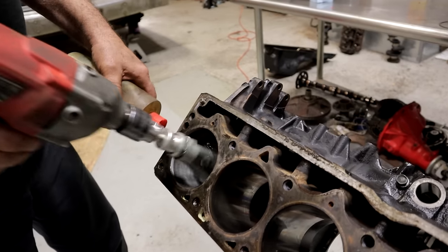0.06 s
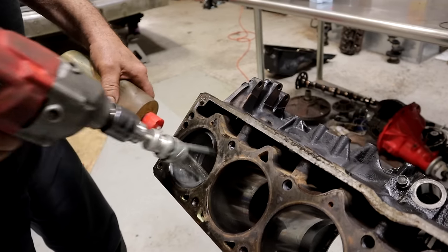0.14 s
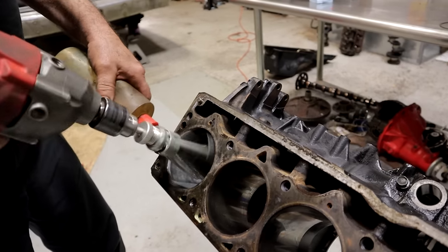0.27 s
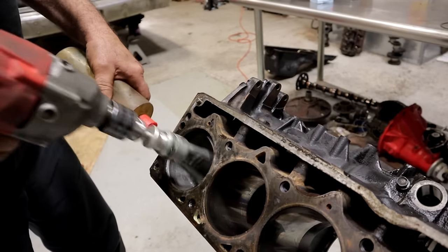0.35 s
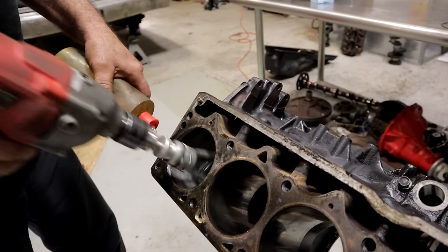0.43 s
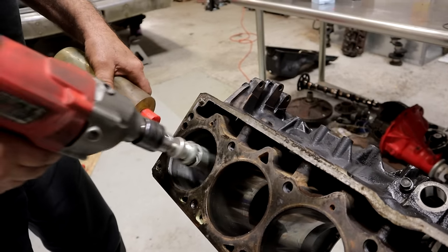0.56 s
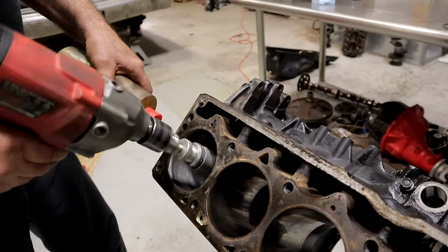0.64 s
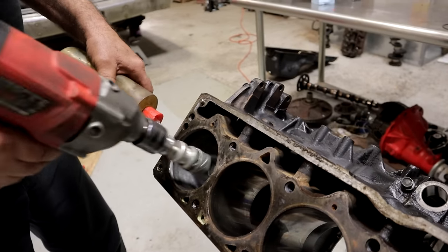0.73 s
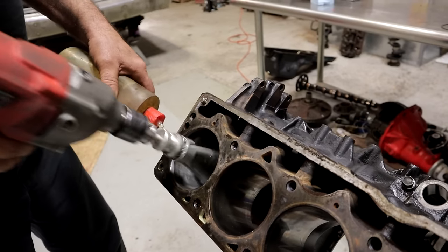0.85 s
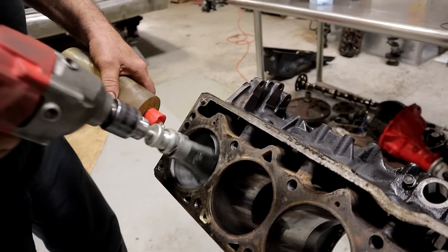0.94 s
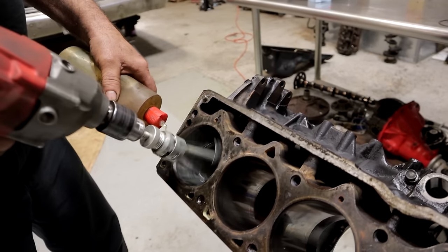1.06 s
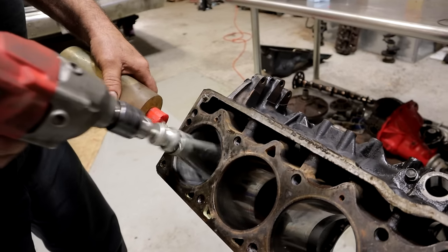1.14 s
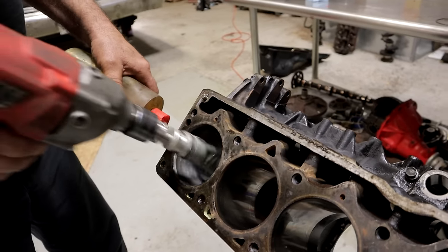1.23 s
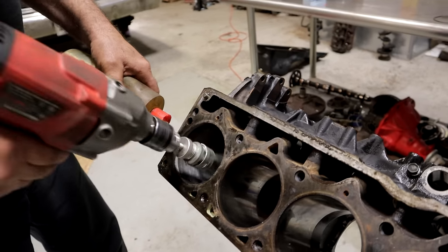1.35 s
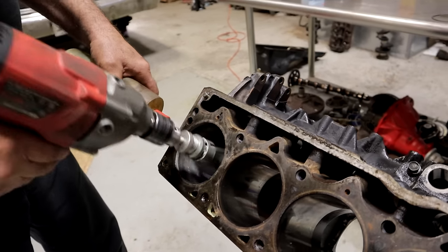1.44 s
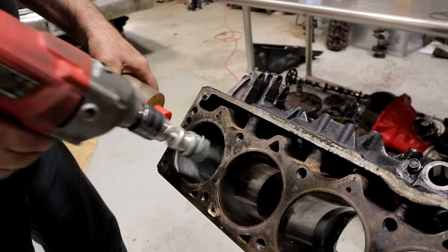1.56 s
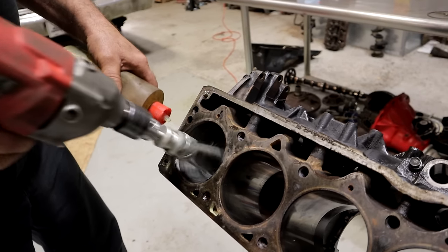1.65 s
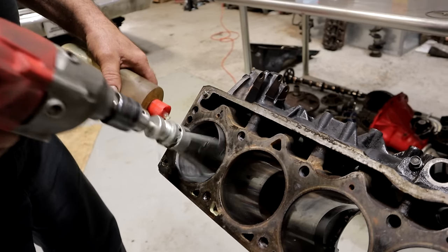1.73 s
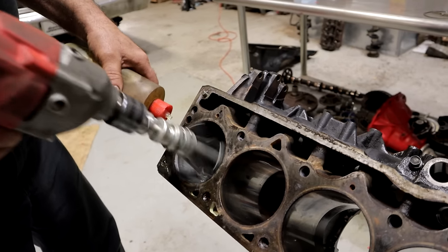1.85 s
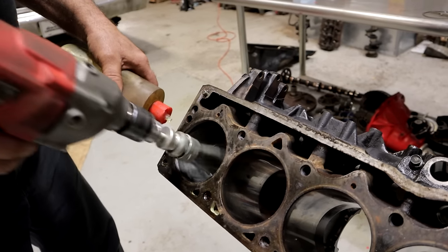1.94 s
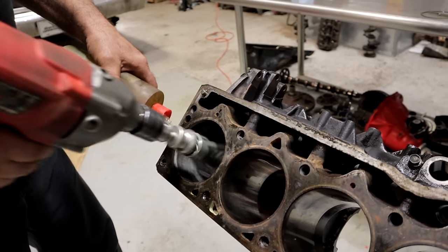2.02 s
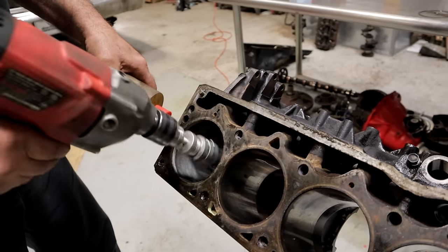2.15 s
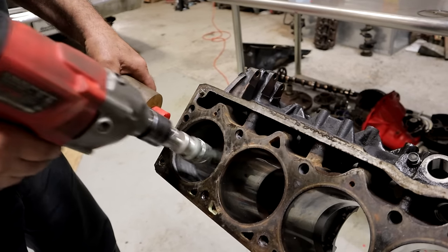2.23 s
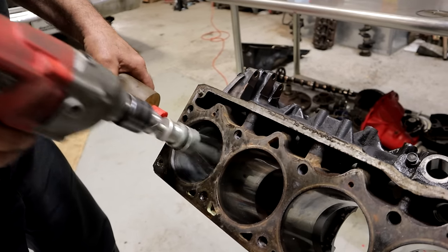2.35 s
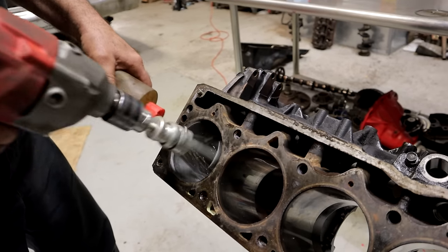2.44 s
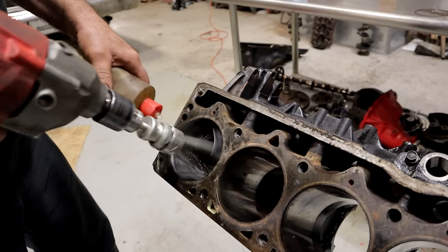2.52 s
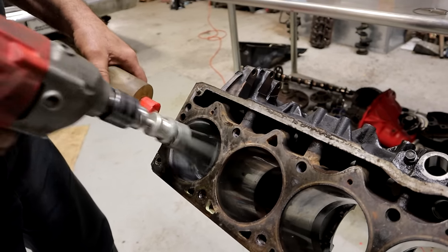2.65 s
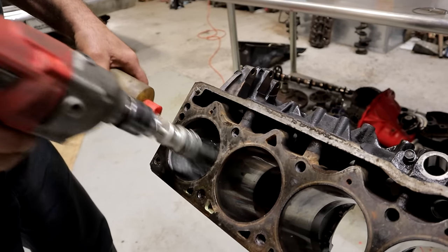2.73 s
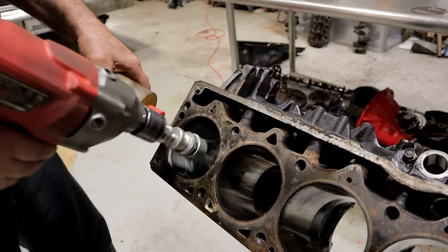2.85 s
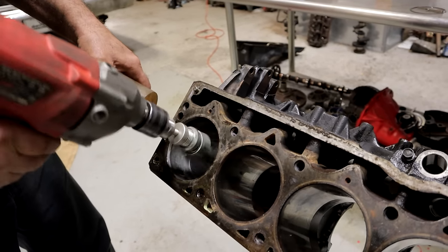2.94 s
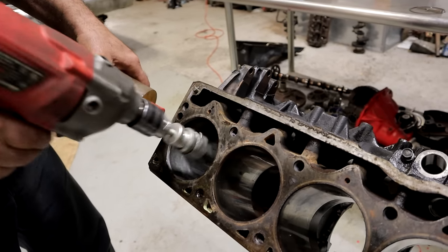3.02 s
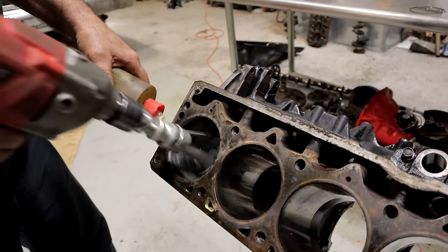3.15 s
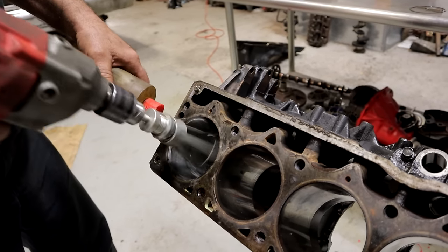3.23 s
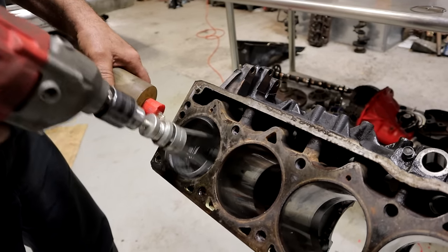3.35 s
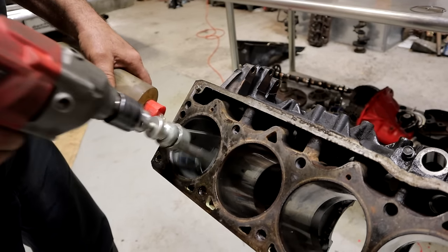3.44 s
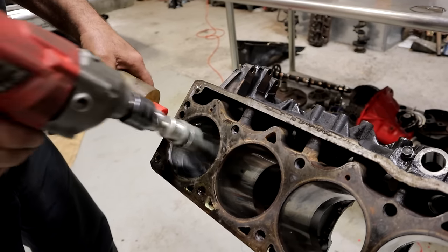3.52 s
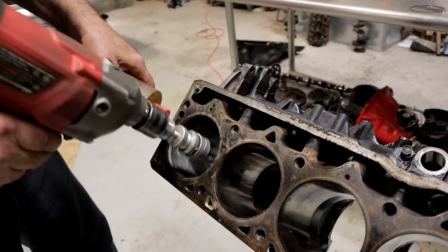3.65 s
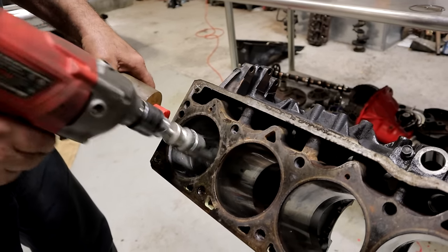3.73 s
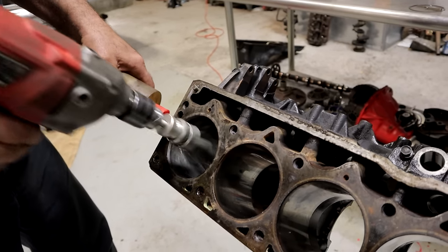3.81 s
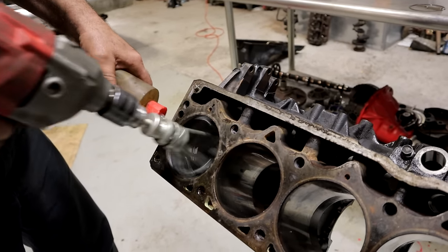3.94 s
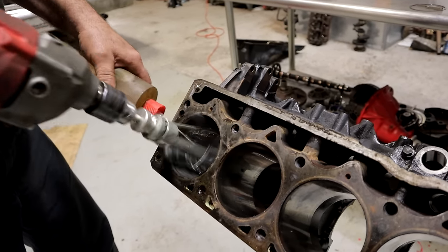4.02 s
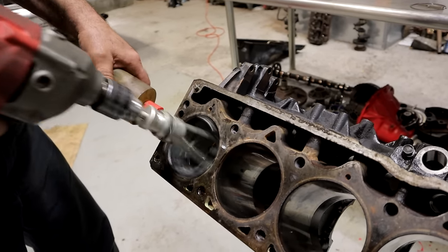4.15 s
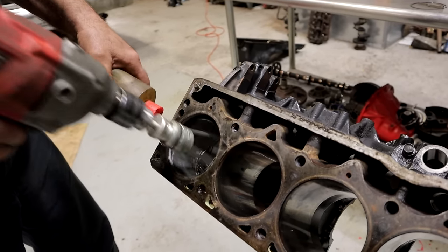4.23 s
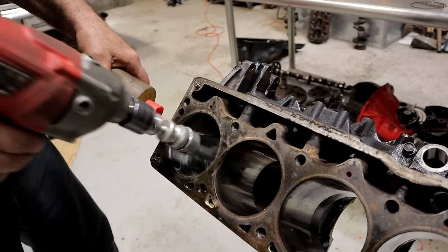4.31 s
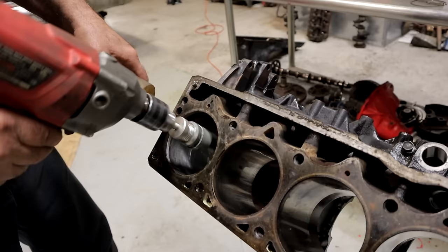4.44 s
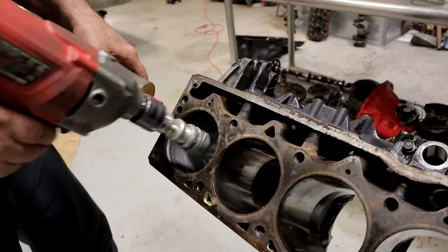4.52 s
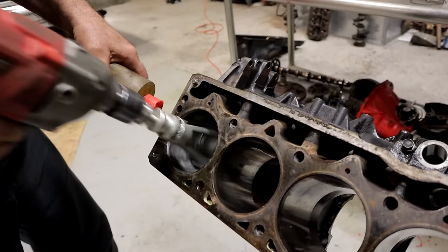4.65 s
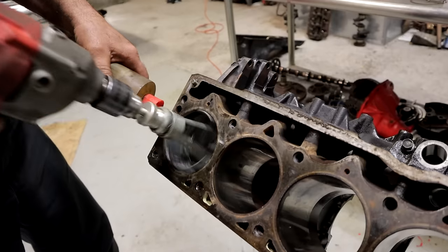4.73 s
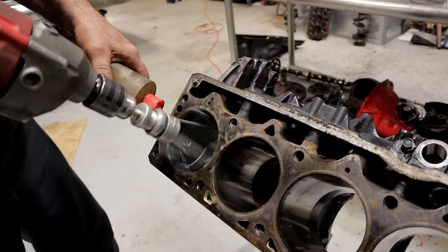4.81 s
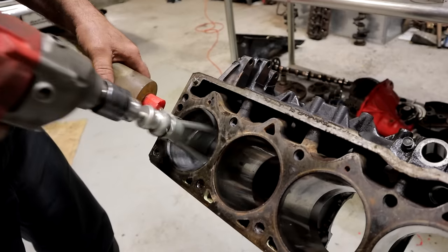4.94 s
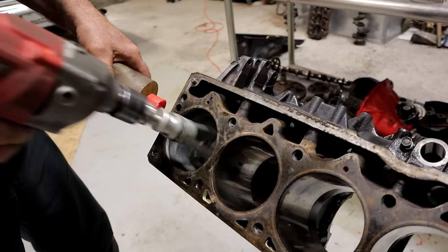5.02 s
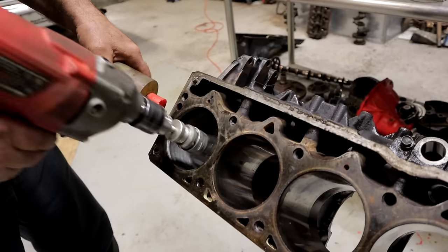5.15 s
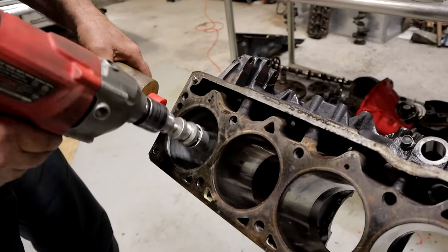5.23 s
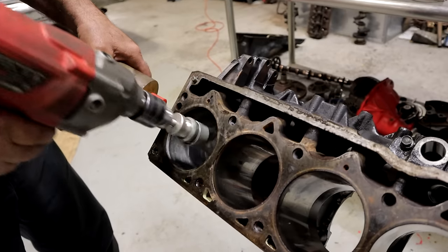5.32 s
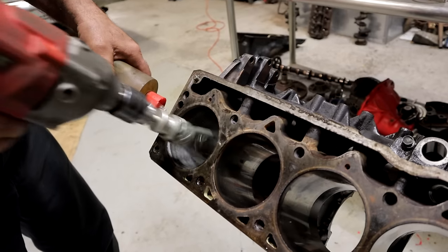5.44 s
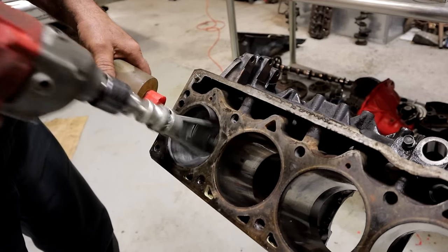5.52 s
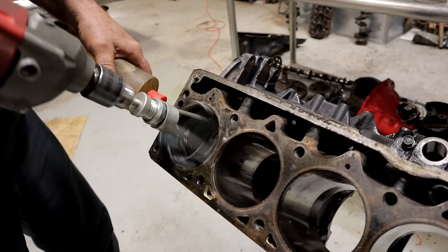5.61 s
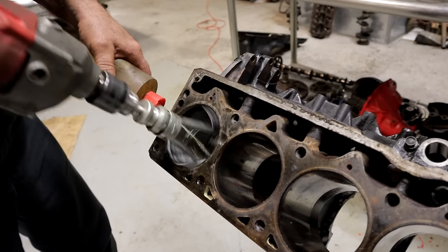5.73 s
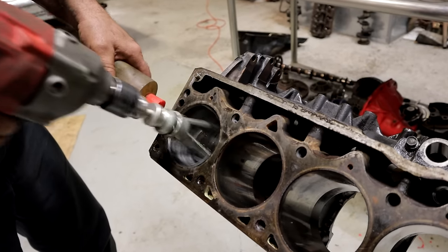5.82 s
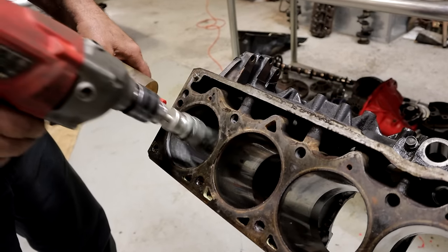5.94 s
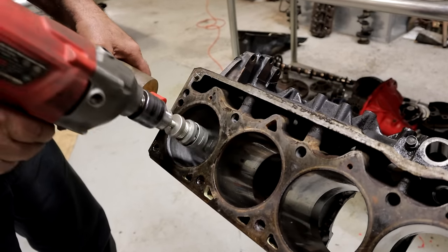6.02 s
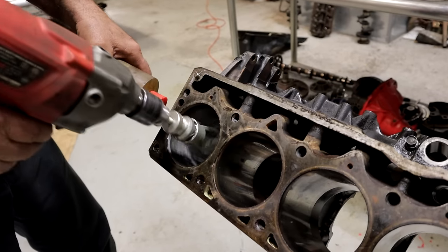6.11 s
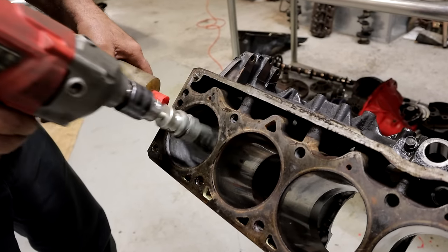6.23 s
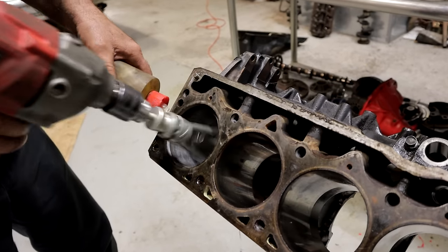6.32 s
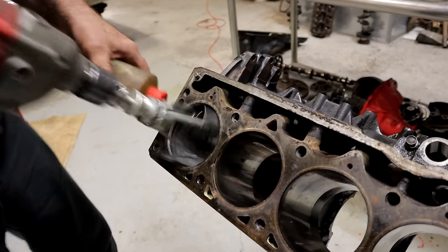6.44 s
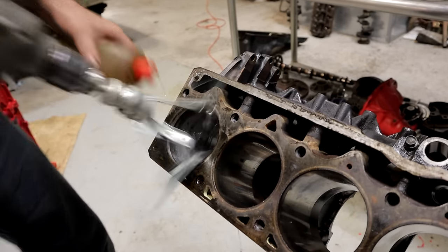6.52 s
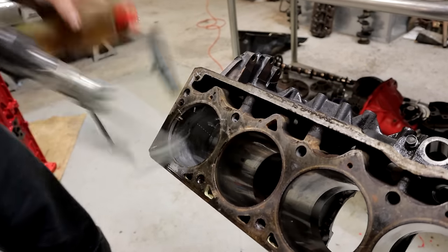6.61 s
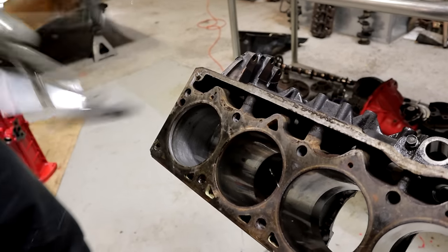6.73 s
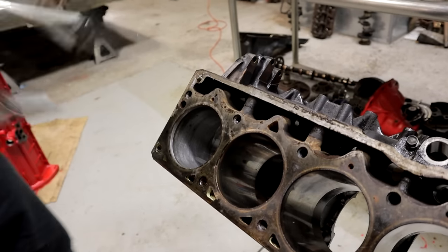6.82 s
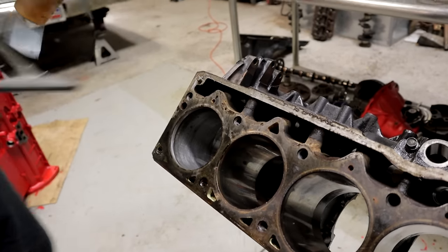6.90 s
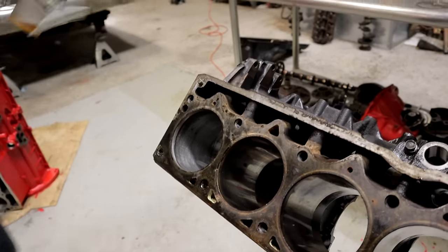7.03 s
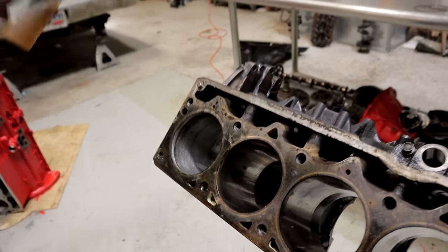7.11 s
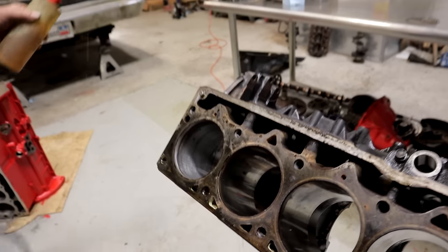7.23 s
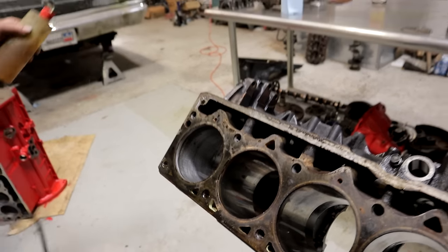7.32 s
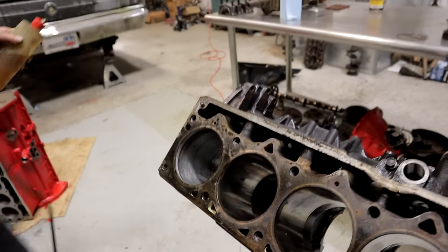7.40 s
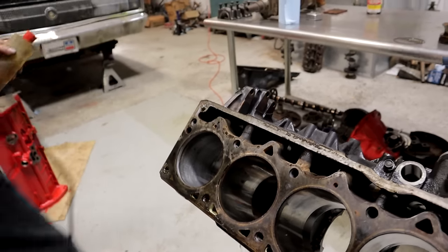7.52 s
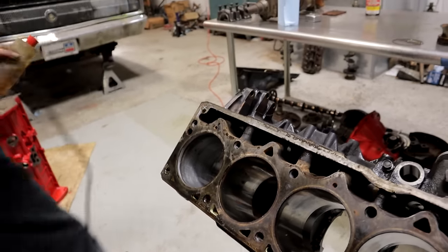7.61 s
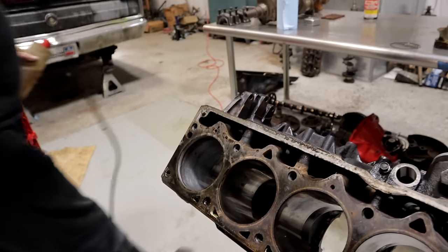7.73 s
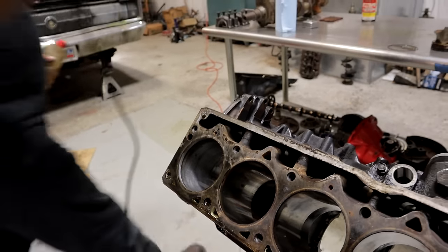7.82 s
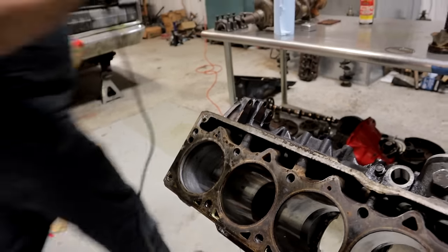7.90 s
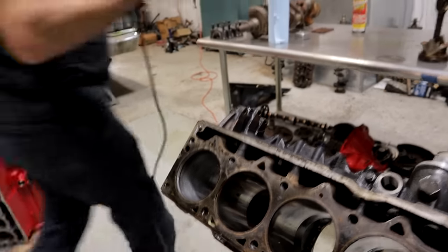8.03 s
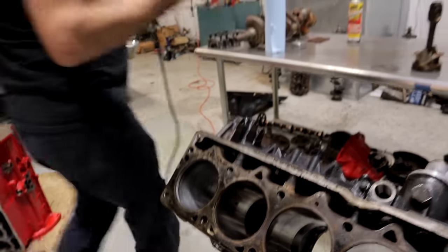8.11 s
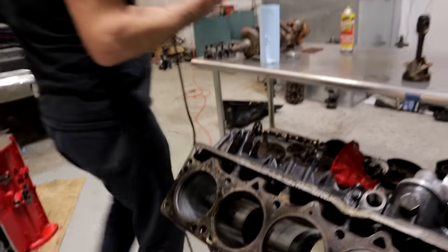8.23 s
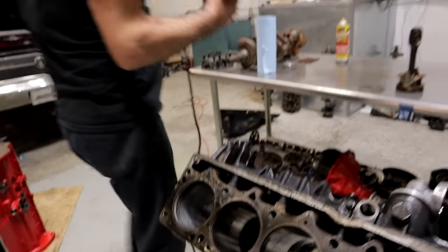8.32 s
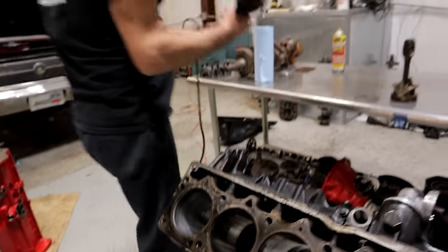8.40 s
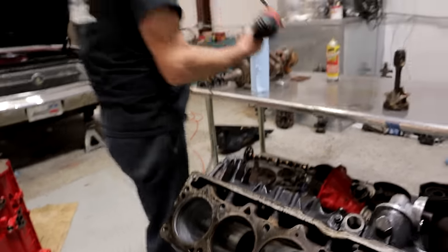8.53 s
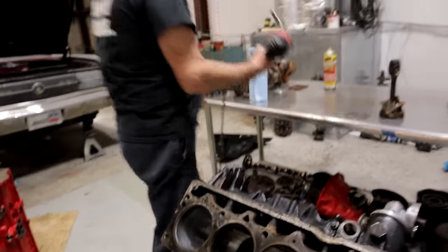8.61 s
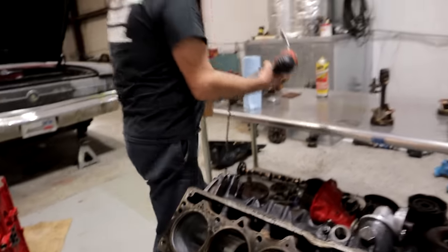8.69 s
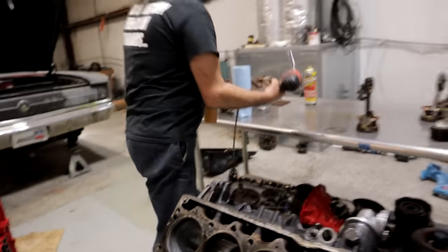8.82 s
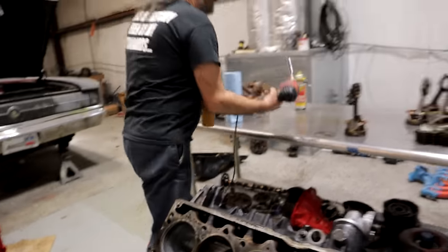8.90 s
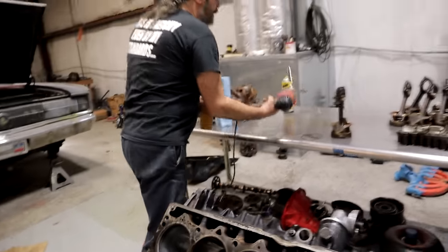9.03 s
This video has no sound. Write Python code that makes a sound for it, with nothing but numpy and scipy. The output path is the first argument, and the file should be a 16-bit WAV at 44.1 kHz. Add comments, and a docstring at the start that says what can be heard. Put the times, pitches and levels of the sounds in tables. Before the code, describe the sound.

A loud, close drill grinds abrasive stones inside a cylinder, with quick back-and-forth scrape swells, oily hiss, short screeches and a few hard gear crunches. One hard clack lands midway and the roar dips slightly. The tool clatters free, a high steel ping rings, and the unloaded motor winds down, whistling lower while loose gears tick slower. Light handling knocks and a step follow in quiet, lightly echoing room air.

```python
"""A close roar first: an electric drill spins a honing tool up and down an oiled cast-iron bore in a garage.
Shaped noise makes the fan, random grains the rattling gears and scraping stones, blurred sines the whine.
The sprung arms clack midway, the roar dips, and they clack again on leaving the bore: noise bursts that ring.
The drill then coasts down with falling harmonic whistles and loose gears ticking through their resonances.
It is carried off with light knocks, soft bumps and a footfall, over room air and a low rumble."""
import sys
import numpy as np
from scipy import signal
from scipy.fft import rfft, irfft, next_fast_len
from scipy.io import wavfile
from scipy.ndimage import map_coordinates

SR = 44100
rng = np.random.default_rng(int(sys.argv[2]) if len(sys.argv) > 2 else 0)


def store_wav(level_fs):
    """Save 16-bit WAV to argv[1]."""
    pcm = np.round(np.clip(np.atleast_2d(level_fs), -1, 1) * 32767)
    wavfile.write(sys.argv[1], SR, pcm.T.astype(np.int16))


N = 399546
CLOCK_S = np.arange(N) / SR
EXIT_S = 6.665  # hone leaves the bore; the coasting sound takes over from the loaded one
WHISTLE_ORDER = 3.48  # whistle fundamental, in multiples of motor speed

# fan noise colour: freq_hz, relative_db_per_hz
FAN_COLOUR = [(24, -60), (40, -50), (107, -50), (136, -27), (241, -20.5), (276, -15.5), (311, -11.5),
              (388, -11.5), (690, 0), (1050, -4.5), (1360, -2.5), (1530, -5), (1720, -9), (1970, -10.5),
              (2300, -11), (2990, -28), (5060, -120)]
# gear case colour: freq_hz, relative_db_per_hz
CASE_COLOUR = [(100, -38), (500, -26.5), (1500, -6), (2700, 4), (3700, 0), (4700, 3), (5500, 3),
               (7200, -0.5), (8000, -0.5), (8750, 2.5), (9400, -3), (10400, -5.5), (11400, -8), (14400, -9),
               (16000, -20)]
# swells from each push or pull of the hone: start_s (the peak), scrape_rise_db, arm_ring_rise_db
STROKES = [(.17, 3, -0.5), (.4, 3.5, 1), (0.721, 1.5, -5), (1.02, 3.5, -2), (1.3, 2.5, -4), (1.64, 2, 2.5),
           (1.9, 2, -4), (2.19, 1, -8), (2.5, 3, 2), (2.789, 1, 2), (3.07, 4, 3), (3.371, 2.5, 1),
           (3.66, 1, 3.5), (3.951, 4, 4), (4.21, 4, 0.5), (4.449, 5, 4.5), (4.951, 4.5, 4.5),
           (5.18, 3.5, 4), (5.531, 2, 4), (5.74, 3, -1), (6.04, 3, 4), (6.36, 3.5, 4.5)]
STROKE_S = 0.095  # time for a swell to fall to 1/e
# ringing of the slack gear train: freq_hz, half_width_hz, relative_db
SLACK_MODES = [(1405, 340, -9.5), (1880, 180, -2.5), (2160, 77, -1.5), (2520, 230, 0), (3070, 280, -4),
               (3470, 180, -1.5), (3780, 230, 0.5), (4140, 170, -2), (4980, 500, -9.5), (5980, 380, -4.5),
               (7230, 540, -14.5), (8160, 400, -13.5), (8750, 300, -11.5), (10400, 490, -19),
               (11800, 800, -25.5), (13150, 600, -23.5)]
# reference level of the slack gears: start_s, level_db
CHATTER_LEVEL = [(6.69, -26.5), (6.82, -34.5), (7.3, -32.5), (7.47, -32.5), (7.75, -33.5), (8.1, -38.5),
                 (8.45, -39.5), (8.65, -51.5), (8.85, -69)]


def amp(db):
    """Decibels to gain."""
    return 10 ** (np.asarray(db) / 20)


def unit(x):
    """Scale to rms 1."""
    return x / np.sqrt(np.mean(x ** 2) + 1e-20)


def along(points, hz):
    """(Hz, value) points read on a log axis."""
    f, v = np.transpose(points)
    return np.interp(np.log(hz + 1), np.log(f + 1), v)


def curves(rows):
    """One value per sample for each column after the time."""
    s, *cols = np.transpose(rows)
    return [np.interp(CLOCK_S, s, c) for c in cols]


def wobble(rate):
    """A smooth random curve, rate knots a second."""
    knots = rng.standard_normal(int(N * rate / SR) + 4)
    return map_coordinates(knots, [np.arange(N) * rate / SR])


def swells(times, heights, width_s):
    """Sum of bell curves: one of the given height at each time, falling to 1/e in width_s."""
    t = np.arange(0, N, 64) / SR
    total = sum(height * np.exp(-((t - s) / width_s) ** 2) for s, height in zip(times, heights))
    return np.interp(CLOCK_S, t, total)


def filtered(x, response):
    """x times a complex response of frequency."""
    size = 2 * next_fast_len(len(x) // 2 + 4096)
    return irfft(rfft(x, size) * response(np.fft.rfftfreq(size, 1 / SR)), size)[:len(x)]


def causal(x, gain):
    """x through a minimum-phase body of the given gain: it rings only after it is struck."""
    def response(hz):
        cepstrum = irfft(np.log(gain(hz) + 1e-6))
        half = len(cepstrum) // 2
        folded = np.r_[cepstrum[0], 2 * cepstrum[1:half], np.zeros(half)]
        return np.exp(rfft(folded))
    return filtered(x, response)


def coloured(x, spectrum):
    """x shaped by a (Hz, dB) spectrum."""
    return causal(x, lambda hz: amp(along(spectrum, hz)))


def resonant(x, modes):
    """x through (Hz, half width Hz, dB) resonances whose powers add."""
    def gain(f):
        return np.sqrt(sum((amp(db) / (1 + ((f - hz) / width) ** 2)) ** 2 for hz, width, db in modes))
    return causal(x, gain)


def bent(x, share):
    """x with its pitch raised by a share that changes over time, less the mean share."""
    return map_coordinates(x, [np.cumsum(1 + share - share.mean())], mode="mirror")


def grains(rate, scatter_db):
    """Random impulses of either sign and uneven size, on average rate a second."""
    return (rng.random(N) < rate / SR) * rng.choice([-1, 1], N) * amp(scatter_db * rng.standard_normal(N))


def add(track, s, db, sound):
    """Mix a sound in from time s, its peak scaled to db."""
    part = track[round(s * SR):][:len(sound)]
    part += amp(db) * sound[:len(part)] / np.abs(sound).max()


def tone(angle, blur, sway_db):
    """A gear tone of rms about 1; play in the teeth blurs its phase and sways its level."""
    return np.sqrt(2) * np.sin(angle + blur * wobble(45)) * amp(sway_db * wobble(7))


def motor_speed():
    """Turns per second: nearly steady under load, then braked by air drag and friction."""
    # under load, sagging as the trigger is eased: start_s, speed_turns_per_s
    driven_speed = [(0, 480.3), (.7, 483), (1.5, 487.5), (2.2, 490.1), (3.2, 489), (4.4, 485.3),
                    (5.6, 485.2), (6.42, 482), (6.665, 415)]
    drag_s, friction_turns_per_s2 = 5.0, 147  # drag time constant, constant deceleration
    driven, = curves(driven_speed)
    kept = np.exp(-np.maximum(CLOCK_S - EXIT_S, 0) / drag_s)
    return np.maximum(driven * kept - friction_turns_per_s2 * drag_s * (1 - kept), 0)


def stone_pressure(angle):
    """Gain: stones press unevenly around the bore, and so load the whole gear train."""
    chuck, idler = angle / 21, angle / 3
    chuck_db = 0.85 * np.cos(chuck) + 0.45 * np.cos(2 * chuck + 1) + 0.18 * np.cos(3 * chuck)
    return amp(chuck_db + 1.1 * np.cos(idler) + 1.2 * wobble(90))


def working_fan(pressure, level_db):
    """Broadband fan noise, modulated by the load."""
    return unit(coloured(rng.standard_normal(N) * pressure ** 0.59, FAN_COLOUR)) * amp(level_db + 0.35)


def gear_rattle(teeth, bite, level_db):
    """Tooth impacts and noise, modulated by the bite, sound through the gear case."""
    return unit(coloured(teeth * bite, CASE_COLOUR)) * amp(level_db + 6.6)


def stone_scrape(grit, level_db):
    """Grit excites the bore, whose resonances swell, fade and shift as the stones travel."""
    # rubbed iron bore: freq_hz, half_width_hz, relative_db
    bore_modes = [(1770, 110, 3.5), (2178, 65, 2), (2505, 176, 4), (3083, 170, 5.5), (3350, 236, 6.5),
                  (4085, 200, 5.5)]
    glide_share, wander_share = .01, .004  # pitch shift with each stroke, and by chance
    stroke_s, rise_db, _ = np.transpose(STROKES)
    bore = sum(resonant(grit, [mode]) * amp(1.45 * wobble(5)) for mode in bore_modes)
    travel = np.cos(np.pi * np.interp(CLOCK_S, stroke_s, np.arange(len(stroke_s))))
    shifted = bent(bore, glide_share * travel + wander_share * wobble(6))
    return unit(shifted) * amp(level_db + 3 + swells(stroke_s, rise_db, STROKE_S))


def hollowed(x):
    """x with a narrow band dulled, its centre and depth drifting."""
    # start_s, centre_hz, depth_db
    hollow_path = [(0, 3680, -1), (.8, 3700, -1), (1.1, 3530, -7), (1.5, 4000, -7), (2, 3880, -6),
                   (2.4, 3800, 0), (2.9, 3800, -5), (3.5, 3800, 1)]
    width_hz = 135
    hz, t, z = signal.stft(x, SR, nperseg=1024)
    s, centre_hz, depth_db = np.transpose(hollow_path)
    band = np.exp(-((hz[:, None] - np.interp(t, s, centre_hz)) / width_hz) ** 2)
    return signal.istft(z * amp(band * np.interp(t, s, depth_db)), SR, nperseg=1024)[1][:N]


def arm_ring(grit, level_db):
    """Grit makes the sprung arms ring in one band that drifts and swells with the strokes."""
    # start_s, pitch_hz
    ring_pitch = [(0, 6252), (2.5, 6195), (4.5, 6193), (5.1, 6014), (6.5, 5950)]
    ring_hz, = curves(ring_pitch)
    stroke_s, _, rise_db = np.transpose(STROKES)
    ring = bent(resonant(grit, [(ring_hz.mean(), 400, 0)]), ring_hz / ring_hz.mean() - 1)
    return unit(ring) * amp(level_db - 0.5 + swells(stroke_s, rise_db, STROKE_S))


def stone_screech(grit, level_db):
    """Two narrow resonances screech, loudest where the stones catch on the wall."""
    # catches, added to the steady screech: start_s (the peak), level_db
    catches = [(3.78, -26), (4.24, -25.5), (5.78, -30), (6.6, -24.5)]
    catch_s, catch_db = np.transpose(catches)
    envelope = amp(level_db - 9) + swells(catch_s, amp(catch_db), width_s=0.087)
    return unit(resonant(grit, [(3230, 166, -1.1), (3870, 210, 0)])) * envelope


def oil_hiss(bite):
    """The oiled stones hiss on some strokes: coloured noise in bell-shaped swells."""
    # start_s (the peak), level_db
    hisses = [(.22, -24), (1.15, -30.5), (1.66, -28.5), (2.3, -30), (2.88, -22), (3.45, -29), (4.03, -24),
              (4.35, -23.5), (4.64, -28), (5.25, -30), (5.52, -25), (5.85, -29), (6.15, -38), (6.45, -26)]
    # freq_hz, relative_db_per_hz
    oil_colour = [(1500, -26), (4000, 4), (6000, -2), (9000, -0.5), (11000, -4), (14500, -10),
                  (16000, -17.5)]
    hiss_s, hiss_db = np.transpose(hisses)
    noise = unit(coloured(rng.standard_normal(N) * bite, oil_colour))
    return noise * swells(hiss_s, amp(hiss_db), width_s=0.072)


def gear_whine(angle, level_db):
    """Tones locked to motor speed; they end as the motor stops driving."""
    # loaded gear train, about the mean drill level: order_of_motor_speed, level_db
    gear_tones = [(.29, -63.5), (.58, -48.5), (.87, -50), (2.31, -43.5), (2.33, -47), (2.5, -45),
                  (2.73, -46), (3.29, -42.5), (3.43, -45), (3.48, -37.5), (3.53, -43), (4.76, -44),
                  (4.95, -43), (5.08, -43), (5.27, -38), (8.77, -42)]
    # pinion whine: start_s, level_db
    pinion_level = [(0, -31.5), (2.6, -32.5), (3.1, -32), (3.7, -47), (4.15, -30), (4.45, -38.5),
                    (4.8, -38), (5.4, -36), (6.6, -36)]
    # second gear stage whine: start_s, level_db
    second_level = [(0, -34), (.35, -38), (.7, -29.5), (1.15, -37), (1.5, -33), (3, -33.5), (3.5, -38),
                    (4.7, -44), (5.3, -38), (5.7, -43), (6.5, -42)]
    power_off_s = 6.55
    pinion_db, = curves(pinion_level)
    second_db, = curves(second_level)
    train = sum(amp(db) * tone(order * angle, blur=min(0.12 * order, .4), sway_db=min(0.42 * order + .4, 2))
                for order, db in gear_tones)
    pinion = amp(pinion_db) * tone(9 * angle, blur=0.54, sway_db=2)
    second = amp(second_db) * tone(2 * WHISTLE_ORDER * angle, blur=0.55, sway_db=3)
    powered = np.clip((power_off_s - CLOCK_S) / .04 + .5, 0, 1)
    return powered * (train * amp(level_db - level_db.mean()) + pinion + second)


def loaded_drill(angle):
    """Fan, gears and stones while the hone is in the bore, all driven by the motor angle."""
    # level of the drill sound, which dips at the first clack and creeps back; layers are set relative to it:
    # start_s, level_db
    drill_level = [(0, -27), (1.2, -26.5), (2.6, -26), (3.5, -26), (4.48, -28), (4.53, -30), (5.3, -29.5),
                   (5.65, -28.5), (6.62, -28.5)]
    level_db, = curves(drill_level)
    pressure = stone_pressure(angle)
    # teeth bite harder once per armature turn
    bite = pressure ** 0.36 * amp(.9 * np.cos(angle) + 0.41 * wobble(200))
    teeth = unit(grains(rate=3500, scatter_db=0.5)) + .5 * rng.standard_normal(N)
    grit = (unit(grains(rate=3200, scatter_db=1.5)) + 0.22 * teeth) * pressure
    roar = hollowed(gear_rattle(teeth, bite, level_db) + stone_scrape(grit, level_db))
    stones = arm_ring(grit, level_db) + stone_screech(grit, level_db) + oil_hiss(bite)
    return working_fan(pressure, level_db) + roar + stones + gear_whine(angle, level_db)


def strikes(rows, width, crack_db, low_hz):
    """Short hard contacts: a noise burst as a crack, plus one ring of half width `width` times its pitch."""
    out, t = np.zeros(N), np.arange(SR // 8) / SR
    for s, db, hz, t60 in rows:
        burst = rng.standard_normal(len(t)) * amp(-60 * t / t60)
        crack = filtered(burst, lambda f: 1j * f / (low_hz + 1j * f) / (1 + 1j * f / (3.2 * hz)) ** 3)
        add(out, s, db, resonant(burst, [(hz, width * hz, 0)]) + amp(crack_db) * crack)
    return out


def thumps(rows):
    """Dull contacts: a few low cycles that die at once."""
    out, t = np.zeros(N), np.arange(SR // 8) / SR
    for s, db, hz, t60 in rows:
        cycles = np.sin(2 * np.pi * hz * t) * amp(-60 * t / t60)
        add(out, s, db, cycles * (1 - np.exp(-2 * hz * t)))
    return out


def arm_clacks():
    """Sprung arms and stones strike with bright bursts; the heavy block takes the blows as low thumps."""
    # strikes: start_s, peak_db, ring_hz, t60_s
    clack_rows = [(4.4922, -2, 8700, .03), (4.5022, 7, 6060, 0.011), (6.6395, -2, 4200, 0.02),
                  (6.6470, 4, 8150, 0.018), (6.6520, -3, 5940, 0.014), (6.6588, 1.5, 5470, 0.014)]
    # block: start_s, peak_db, pitch_hz, t60_s
    jolt_rows = [(4.496, -37, 210, 0.02), (6.645, -44, 233, .02)]
    return strikes(clack_rows, width=0.13, crack_db=-11, low_hz=2210) + thumps(jolt_rows)


def gear_crunches():
    """Single hard crunches in the loaded gear case: broad, crack-rich bursts."""
    # start_s, peak_db, ring_hz, t60_s
    crunch_rows = [(3.153, -3, 3300, .008), (3.340, -3.5, 3300, .008), (3.379, -2, 3300, .008),
                   (5.829, -5, 3200, .014), (6.049, -8, 3300, .008), (6.091, -6, 3300, .008),
                   (6.403, -7, 3300, .008)]
    return strikes(crunch_rows, width=.4, crack_db=-5, low_hz=1200)


def slack_cycles(speed):
    """Cycles of the slack gears since the hone left the bore; they knock near each whole number."""
    turns_per_tick, first_tick_share = 3.04, .65
    turns = np.cumsum(speed * (CLOCK_S > EXIT_S)) / SR
    return turns / turns_per_tick - first_tick_share


def free_air(octaves):
    """Fan noise and gear case hiss, both falling with the speed in octaves re that on leaving the bore."""
    rush = unit(coloured(rng.standard_normal(N), FAN_COLOUR))
    hum = unit(resonant(rng.standard_normal(N), [(695, 200, 4.0), (374, 88, -3.5)]))
    fan = unit(rush + 1.14 * hum) * amp(-37 + 9.5 * octaves)
    hiss = unit(coloured(rng.standard_normal(N), CASE_COLOUR)) * amp(-38.5 + 10.5 * octaves)
    return fan + hiss


def falling_whistle(speed, angle):
    """Whistle harmonics glide down past the vents' response; turbulence in the vents makes them flutter."""
    # harmonic_number (of the whistle fundamental), relative_db
    free_tones = [(2, 3), (2.58, -7), (3, -14), (4, -10), (5, -16), (5.94, -16), (6, -5), (7, -19),
                  (8, -13), (9, -24), (10, -20), (11, -23), (12, -23)]
    # how well whistles radiate: freq_hz, relative_db
    vent_response = [(700, -45), (930, -32), (1050, -17), (1170, -14), (1260, -19), (1310, -11), (1400, -8),
                     (1650, -8), (1790, -6), (1950, -17), (2120, -19), (2480, -2), (2750, 0), (3100, -14),
                     (3850, -11), (4250, 3), (4700, 5), (5000, 4), (5350, 8), (5850, -1), (6250, 3),
                     (6650, -2), (7000, -10), (8200, -10), (9500, -24)]
    flutter_db, flutter_rad = .45, .07  # both per harmonic number
    whistle = np.zeros(N)
    for k, db in free_tones:
        order = k * WHISTLE_ORDER
        gain = amp(db + along(vent_response, order * speed) + flutter_db * k * wobble(50))
        phase = order * angle + flutter_rad * k * wobble(260)
        whistle += gain * tone(phase, blur=flutter_rad * k, sway_db=1)
    return amp(-42) * whistle * np.clip(speed / 78, 0, 1) ** 2  # fades out at a crawl


def slack_chatter(speed):
    """Slack teeth rattle in a bunch just after each knock and in chance clumps, ringing the gear train."""
    chatter_db, = curves(CHATTER_LEVEL)
    slack = amp(2.6 * np.cos(2 * np.pi * (slack_cycles(speed) - .12)) + 2.4 * wobble(120))
    knocks = unit((unit(grains(rate=1200, scatter_db=3.5)) + .4 * rng.standard_normal(N)) * slack)
    # slow, soft knocks wake only the strongest rings of the case
    slow = np.clip(1 - speed / 190, 0, 1)
    soft = unit(resonant(knocks, [(2600, 390, 3), (2100, 290, 0), (4200, 150, -9), (8300, 820, -4.0)]))
    chatter = unit(resonant(knocks, SLACK_MODES)) * (1 - 0.27 * slow) + slow * soft
    return amp(chatter_db - 5.5) * chatter


def coasting_drill(speed, angle):
    """The fan dies away with the speed, the armature whistles downwards and the slack gears chatter."""
    octaves = np.log2(speed / speed[round(EXIT_S * SR)] + 1e-6)
    return free_air(octaves) + falling_whistle(speed, angle) + slack_chatter(speed)


def gear_ticks(speed):
    """Teeth knock across their play about once a cycle, ever more slowly: a graze, then a blow, ringing anew."""
    # hardest tooth knocks: start_s, peak_db
    hard_ticks = [(6.8552, -17), (6.8873, -18), (6.8988, -18), (6.9137, -17), (6.984, -16.5), (7.0362, -14),
                  (7.1017, -16), (7.142, -17), (7.1806, -19), (7.199, -20), (7.2332, -17), (7.2948, -16.5),
                  (7.3283, -17), (7.3787, -19), (7.3915, -18), (7.4108, -19), (7.4305, -18), (7.45, -13),
                  (7.4586, -15), (7.4709, -14), (7.475, -16), (7.4836, -14), (7.495, -19), (7.5090, -14.5),
                  (7.533, -14), (7.5493, -16), (7.5584, -18), (7.5847, -13), (7.6061, -15.5), (7.6142, -19),
                  (7.6306, -18), (7.6438, -16), (7.6575, -15), (7.6855, -16), (7.7094, -18),
                  (7.7195, -18.5), (7.7418, -18), (7.7658, -15), (7.7778, -17), (7.7937, -20),
                  (7.8142, -20.5), (7.8356, -22), (7.8526, -23), (7.872, -21), (7.89, -20), (7.9052, -23),
                  (7.9219, -19), (7.9455, -24), (7.9605, -23.5), (7.9823, -22), (8.0052, -21),
                  (8.0257, -24), (8.047, -28), (8.0681, -25), (8.0925, -28), (8.1364, -22), (8.1624, -22.5),
                  (8.1903, -24), (8.2172, -23), (8.2215, -26), (8.2552, -27), (8.2771, -29), (8.3055, -23),
                  (8.3085, -25), (8.3405, -28), (8.3654, -32), (8.3904, -30), (8.4357, -26.5), (8.458, -29),
                  (8.4801, -33)]
    tick_over_chatter_db, scatter_db, jitter_cycles = 9, 1.3, .05
    soften_below_turns_per_s = 73
    lead_s, graze_db = .0023, -10.5  # graze before blow, and its level relative to the blow
    out, t = np.zeros(N), np.arange(SR // 20) / SR
    cycles = slack_cycles(speed)
    beats = np.arange(int(cycles[-1]))
    late, strength = np.clip(rng.standard_normal((len(beats), 2)), -2, 2).T
    times = np.interp(beats + jitter_cycles * late, cycles, CLOCK_S)
    slowness = np.clip(np.interp(times, CLOCK_S, speed) / soften_below_turns_per_s, .1, 1)
    soften_db = 20 * np.log10(slowness ** 2)
    chatter_db = np.interp(times, *np.transpose(CHATTER_LEVEL))
    levels = chatter_db + tick_over_chatter_db + scatter_db * strength + soften_db
    # a hard knock replaces the ordinary one of its cycle
    hard = np.interp(np.transpose(hard_ticks)[0], CLOCK_S, cycles)
    ordinary = np.abs(beats[:, None] - hard).min(axis=1) > 2 / 3
    for s, db in [*hard_ticks, *zip(times[ordinary], levels[ordinary])]:
        graze = amp(graze_db - 60 * t / .005)
        blow = (t >= lead_s) * amp(-60 * np.abs(t - lead_s) / .011)
        contact = (graze + blow) * rng.standard_normal(len(t))
        modes = [(hz, width, level + 1.05 * rng.standard_normal()) for hz, width, level in SLACK_MODES]
        add(out, s - lead_s / 3, db, resonant(contact, modes))
    return out


def arm_pings():
    """The freed steel arms snap against their stop and ring high and briefly: decaying sines."""
    # start_s, peak_db
    ping_rows = [(7.021, -2.5), (7.0228, -11)]
    # freq_hz, relative_db, t60_s
    steel_modes = [(5846, -20, .03), (10970, -1, 0.014), (11360, -9, 0.014)]
    out, t = np.zeros(N), np.arange(SR // 5) / SR
    for s, db in ping_rows:
        ring = sum(amp(level - 60 * t / t60) * np.sin(2 * np.pi * (hz * t + rng.random()))
                   for hz, level, t60 in steel_modes)
        snap = np.diff(rng.standard_normal(len(t) + 1)) * amp(-60 * t / .012)
        add(out, s, db, ring + 0.3 * snap)
    return out


def carrying_knocks():
    """Light knocks as the drill is carried, with soft low bumps among them."""
    # knocks: start_s, peak_db, ring_hz, t60_s
    knock_rows = [(8.5075, -25.5, 3800, 0.014), (8.528, -31, 2730, 0.027), (8.561, -32, 3500, .015),
                  (8.583, -35, 2320, 0.037), (8.5975, -30, 2800, 0.017), (8.6525, -21, 3660, 0.016),
                  (8.654, -23, 6650, 0.026), (8.672, -32, 3500, .018), (8.7145, -38, 1480, 0.028),
                  (8.718, -31, 4100, .018), (8.744, -34, 3000, 0.018), (8.781, -37.5, 2500, 0.024),
                  (8.8525, -31.5, 1270, 0.016), (8.854, -35, 3000, .014), (8.9575, -40, 2700, .015)]
    # bumps: start_s, peak_db, pitch_hz, t60_s
    bump_rows = [(8.5125, -33, 1000, .005), (8.7575, -43, 750, .009), (8.769, -36, 550, 0.0055),
                 (8.776, -41, 600, 0.0057), (8.853, -40, 400, .008)]
    return thumps(bump_rows) + strikes(knock_rows, width=0.31, crack_db=-11, low_hz=600)


def footfall():
    """One dull push on the concrete with a short scuff, waking low room modes."""
    # start_s, peak_db, pitch_hz, t60_s
    thud_rows = [(8.5115, -22, 225, 0.01)]
    # room modes: freq_hz, relative_db, t60_s
    boom_modes = [(110, -27, .4), (167, -19, 0.22)]
    out, t = np.zeros(N), np.arange(SR // 4) / SR
    for s, db, hz, t60 in thud_rows:
        scuff = unit(resonant(rng.standard_normal(len(t)), [(260, 260, 0)])) * amp(-60 * t / 0.059)
        push = np.sin(2 * np.pi * hz * t) * amp(-60 * t / t60) * (1 - np.exp(-t / 0.0037))
        boom = sum(amp(level - 60 * t / fade) * np.sin(2 * np.pi * mode_hz * t)
                   for mode_hz, level, fade in boom_modes)
        step = push / np.abs(push).max() + boom + 0.11 * scuff
        add(out, s, db, filtered(step, lambda f: (1j * f / (70 + 1j * f)) ** 2))
    return out


def garage(x):
    """The room's answer: a delayed noise tail, the treble dying first."""
    # freq_hz, t60_s
    decay = [(150, 0.46), (2000, 0.43), (12000, 0.24)]
    hz, t, z = signal.stft(rng.standard_normal(SR // 2), SR, nperseg=256)
    tail = signal.istft(z * amp(-60 * t / along(decay, hz)[:, None]), SR, nperseg=256)[1]
    return signal.fftconvolve(x, np.pad(tail, (SR // 150, 0)) / np.linalg.norm(tail))[:N]


def background():
    """Quiet room air as coloured noise, and a low stir of moving about as resonant noise."""
    # stir: start_s, level_db
    rumble_level = [(0, -90), (6.5, -75), (7.5, -63), (8.2, -67), (8.7, -63), (8.9, -58), (9.05, -60)]
    # room air: freq_hz, relative_db_per_hz
    air_colour = [(25, -19), (100, -7.5), (150, -4), (300, -11), (700, -12.5), (1800, -16.5), (4000, -18.5),
                  (8000, -21.5), (15000, -33)]
    rumble_db, = curves(rumble_level)
    low_noise = unit(resonant(rng.standard_normal(N), [(48, 40, -2), (158, 20, 0)]))
    rumble = low_noise * amp(rumble_db + 1.95 * wobble(10))
    return rumble + amp(-56.0) * unit(coloured(rng.standard_normal(N), air_colour))


def scene():
    """The drill works, coasts down and is carried off; both channels hear the same."""
    speed = motor_speed()
    angle = 2 * np.pi * np.cumsum(speed) / SR
    load = np.clip((EXIT_S - CLOCK_S) / 0.013 + .5, 0, 1)
    drill = load * loaded_drill(angle) + (1 - load) * coasting_drill(speed, angle)
    near = gear_ticks(speed) + arm_pings() + arm_clacks()
    far = carrying_knocks()
    step = footfall()
    echo = garage(amp(-15.5) * near + amp(-8.0) * far + amp(-13) * step)
    mono = drill + gear_crunches() + near + far + step + echo + background()
    return np.array([mono, mono])


def record(dry):
    """The loudest clacks clip, then all above the band limit is cut."""
    top_hz = 15850
    return np.array([filtered(x, lambda hz: hz < top_hz) for x in np.clip(dry, -1, 1)])


dry = scene()
out = record(dry)
store_wav(out)
```